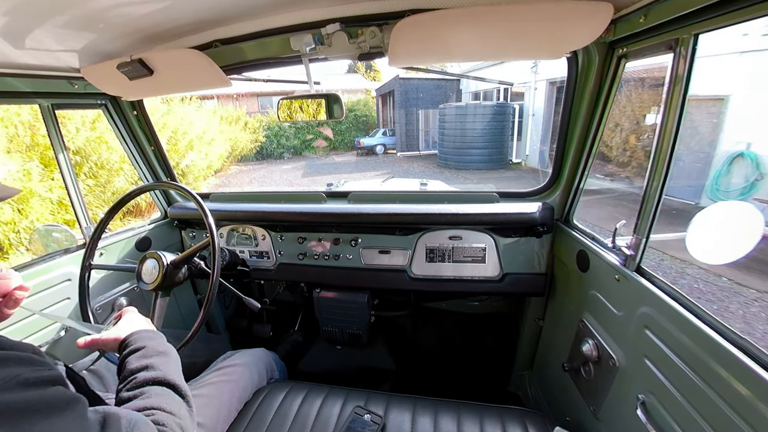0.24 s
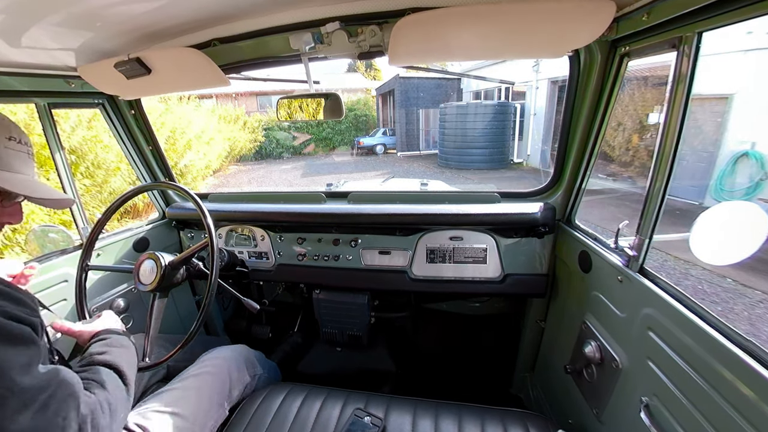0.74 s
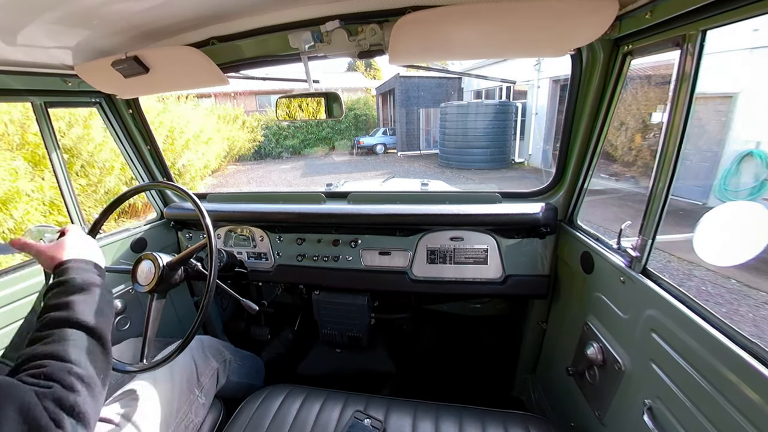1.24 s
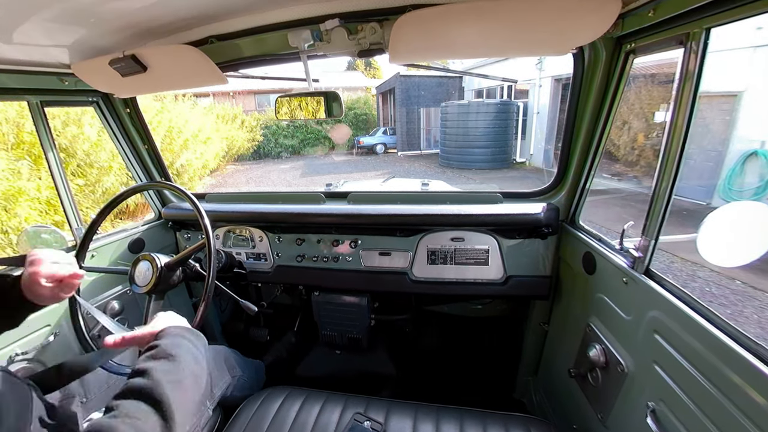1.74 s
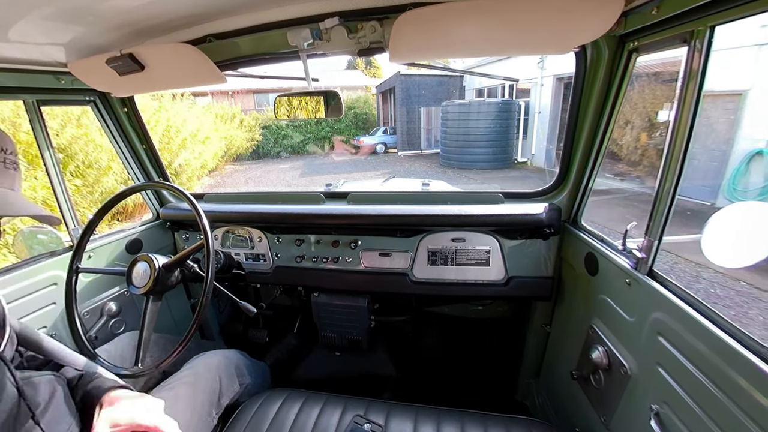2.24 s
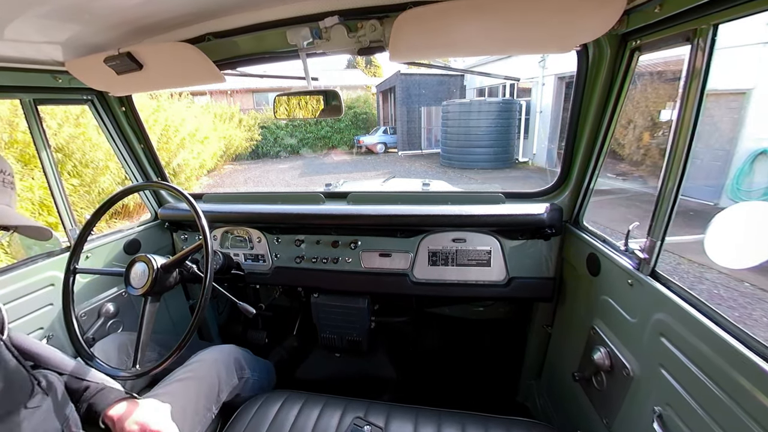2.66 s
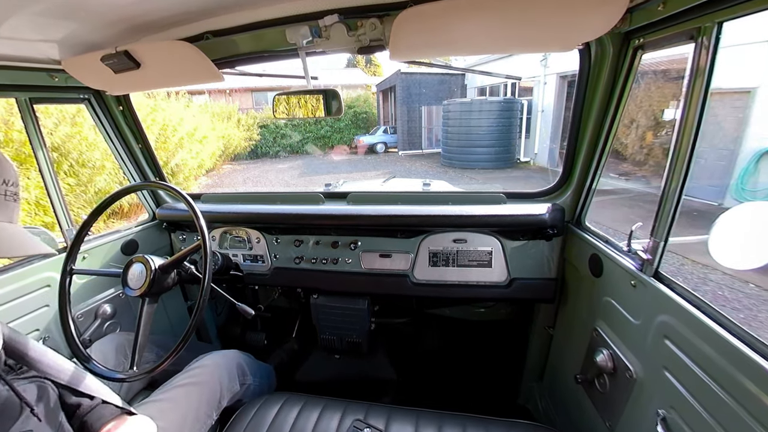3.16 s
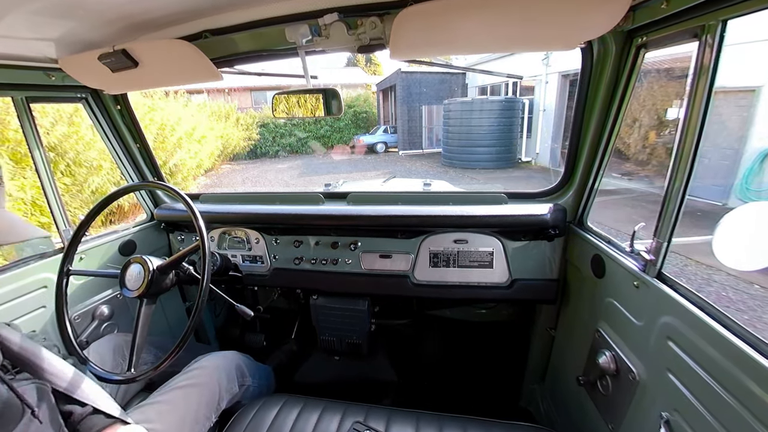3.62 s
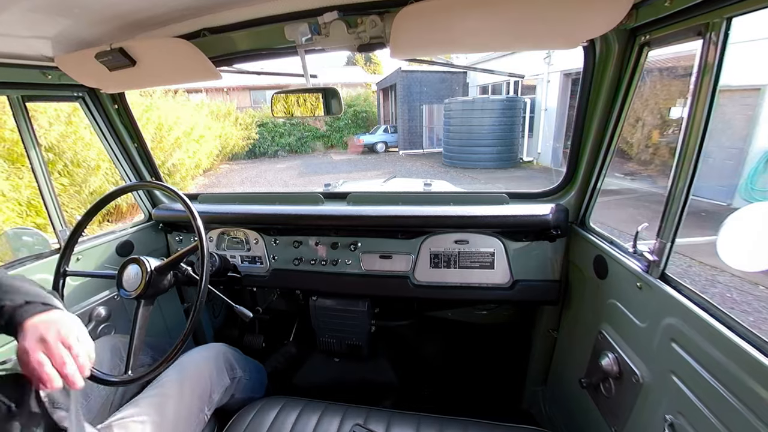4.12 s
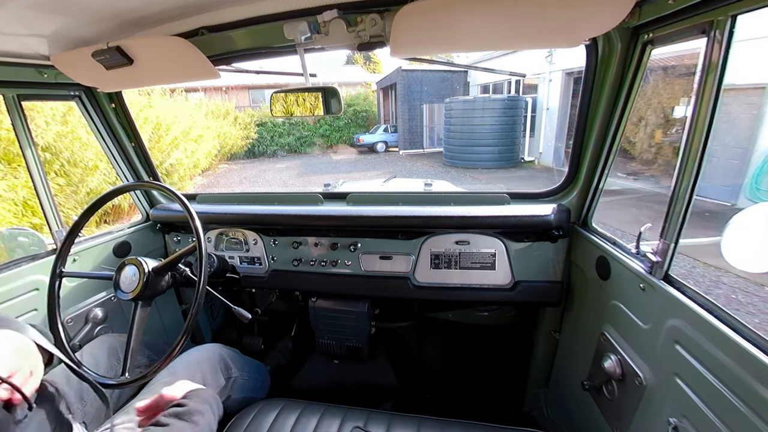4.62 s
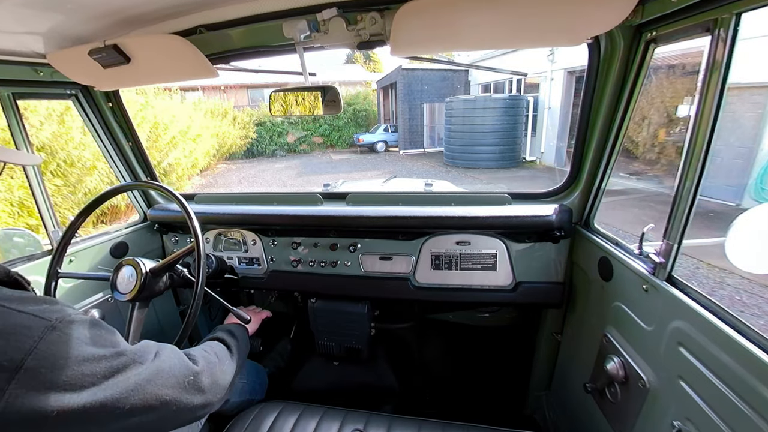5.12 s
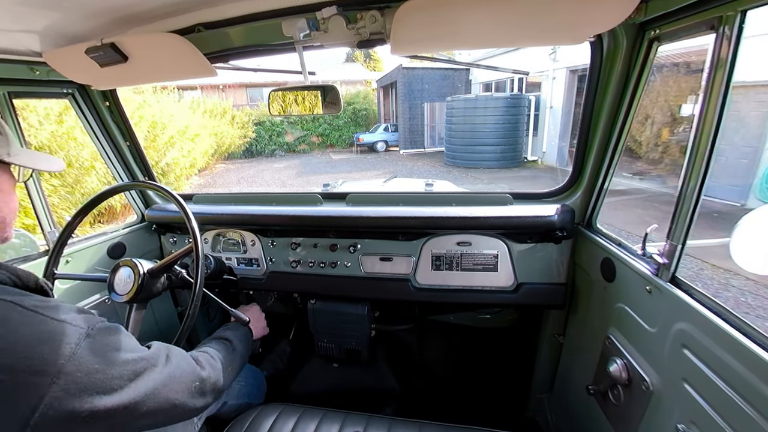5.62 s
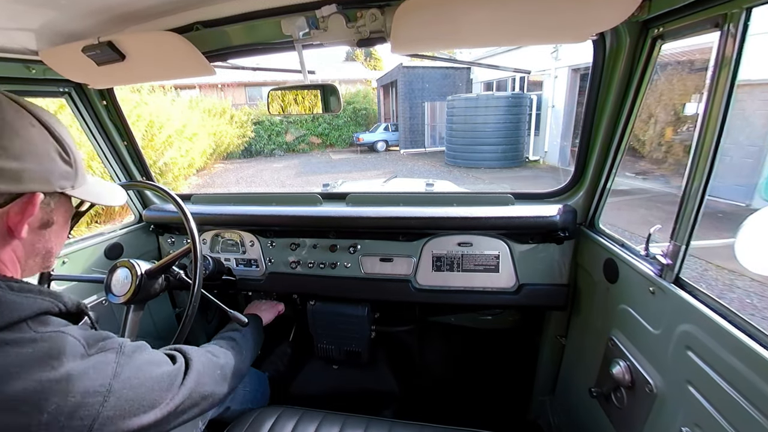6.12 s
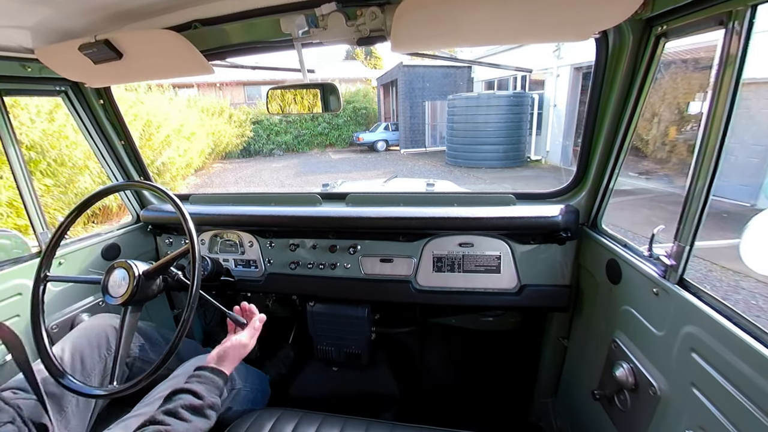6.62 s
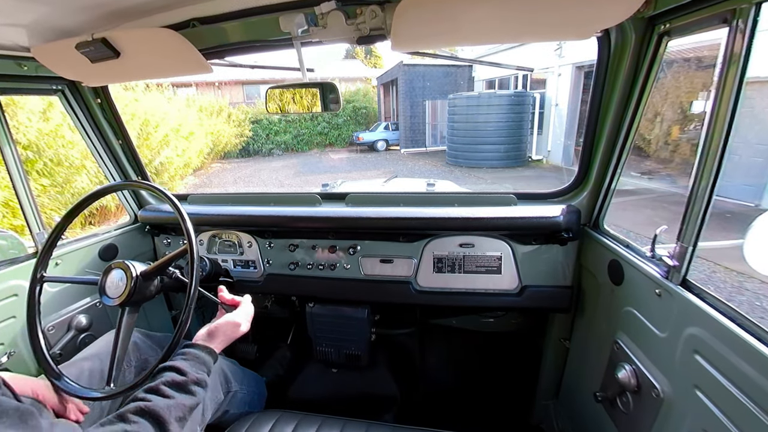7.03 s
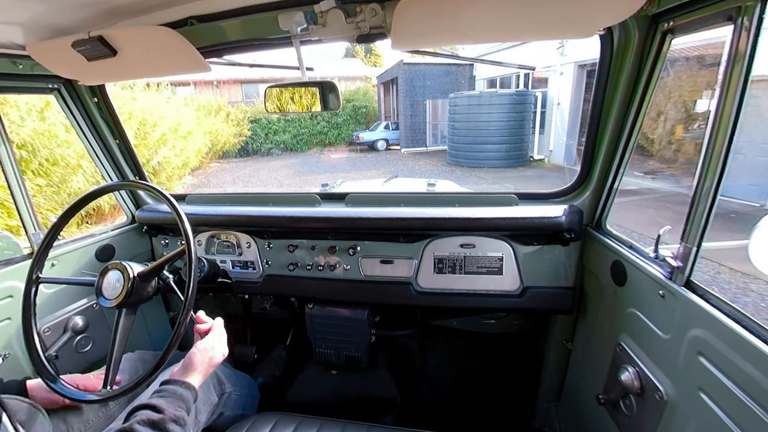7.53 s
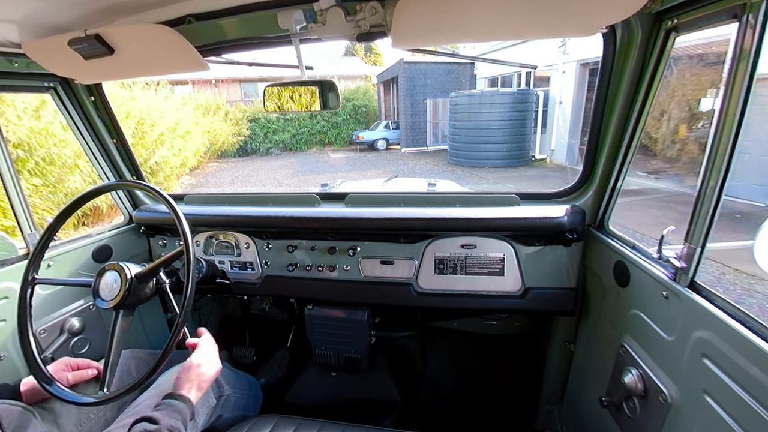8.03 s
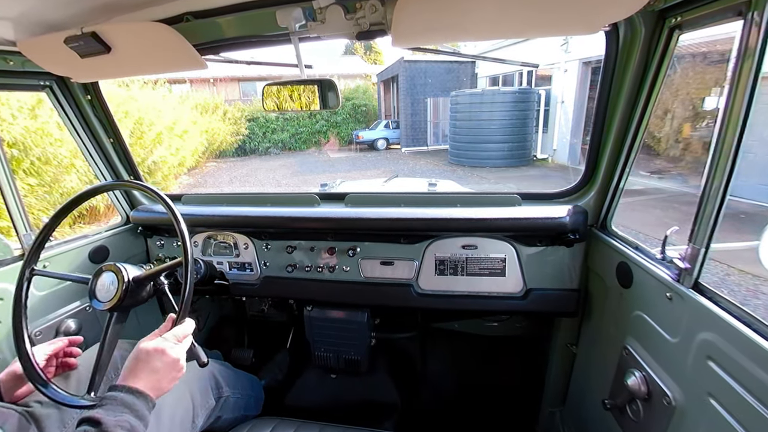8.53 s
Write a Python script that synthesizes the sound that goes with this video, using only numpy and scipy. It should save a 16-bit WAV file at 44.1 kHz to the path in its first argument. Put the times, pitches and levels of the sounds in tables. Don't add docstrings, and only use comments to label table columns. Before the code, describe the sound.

Inside a bare metal off-road vehicle cab, an old six-cylinder engine idles with a low, uneven boom and ticking valves. Seatbelt webbing rustles and metal tongue and buckle click sharply. The throttle is blipped once and revs sink back, a handle rattles, then a gear lever thuds with squeaky scraping linkage. Finally the engine swells deeper and louder. Fixed microphone in the cab, close to the driver.

```python
import sys
import numpy as np
from scipy import signal
from scipy.fft import rfft, irfft, next_fast_len
from scipy.io import wavfile
from scipy.ndimage import uniform_filter1d

SR = 44100
rng = np.random.default_rng(int(sys.argv[2]) if len(sys.argv) > 2 else 0)


def file_out(sig):
    cols = np.atleast_2d(sig).T
    lim = np.clip(cols, -1, 1)
    pcm = np.round(lim * 32767).astype(np.int16)
    wavfile.write(sys.argv[1], SR, pcm)


def rack_gain(trim_db):
    fader = np.asarray(trim_db, float)
    return 10 ** (fader / 20)


N = 386757

# (frequency [Hz], level [dB per Hz])
CAB_AIR = [(12, -25), (20, -22), (28, -1.5), (34, -7.5), (43, 2), (51, -13), (62, -21.5), (76, -18.5),
           (102, -9.5), (125, -13), (147, -13.5), (205, -10), (230, -14), (246, -22), (262, -19.5),
           (290, -29.5), (330, -37)]
# (time [s], peak level [dB], body below [dB], sparkle below [dB], t60 [s])
BELT = [(0.2345, -42, -11, -13, 0.27), (0.9718, -41.5, -16, -29, 0.27), (0.997, -37, -19, -18, 0.17),
        (1.1343, -45, -7, -20, 0.11), (1.5045, -64, -3, -26, 0.11), (1.6026, -37.5, -8, -16, 0.27),
        (1.7324, -57, 10, -16, 0.1), (1.838, -52, 6, -18, 0.11), (1.991, -34, -21, -11.5, 0.18),
        (2.219, -27.5, -30, -11.5, 0.19), (3.046, -37, 1.5, -28, 0.055), (3.145, -33, -19, -13, 0.19),
        (3.3214, -44, -25, -18, 0.078), (3.33, -26.5, -21, -23, 0.11), (3.4141, -44.5, -15, -16, 0.056),
        (3.524, -41, -11, -32, 0.11), (3.741, -46, -13, -18, 0.1), (3.7495, -24, -20, -11, 0.145),
        (3.9389, -46, -4, -22, 0.072), (4.035, -39.5, -14, -15, 0.074), (4.128, -30.5, -9, -32, 0.06)]


def rms_one(x):
    return x / np.sqrt(np.mean(x ** 2) + 1e-20)


def in_time(rows):
    s, *columns = np.transpose(rows)
    return [np.interp(np.arange(N) / SR, s, c) for c in columns]


def at_hz(points, hz):
    points = np.array(points)
    return np.interp(np.log(hz), np.log(points[:, 0]), points[:, 1], left=-90, right=-90)


def drift(rate, step=1):
    r = np.exp(-80 * np.pi * rate / SR)
    white = rng.standard_normal(N // 40 + 2002)
    slow = signal.lfilter([1], [1, -2 * r, r * r], white)[2000:]
    return np.interp(np.arange(0, N, step) / 40, np.arange(len(slow)), rms_one(slow - slow.mean()))


def swells(rows, height=lambda v: v):
    t = np.arange(0, N, 64) / SR
    bells = sum(height(v) * np.exp(-((t - s) / half_s) ** 2) for s, v, half_s in rows)
    return np.interp(np.arange(N) / SR, t, bells)


def coloured(x, spectrum):
    size = next_fast_len(len(x))
    hz = np.maximum(np.fft.rfftfreq(size, 1 / SR), 1)
    return irfft(rfft(x, size) * rack_gain(at_hz(spectrum, hz)), size)[:len(x)]


def band(x, low_hz, high_hz):
    return signal.sosfilt(signal.butter(2, [low_hz, high_hz], "band", fs=SR, output="sos"), x)


def ring(strikes, hz, t60_s):
    r, w = rack_gain(-60 / (t60_s * SR)), 2 * np.pi * hz / SR
    return signal.lfilter([0, np.sin(w)], [1, -2 * r * np.cos(w), r * r], strikes + 1e-18)


def bursts(rows, spectrum, grain_db):
    envelopes, t = np.zeros((3, N + SR)), np.arange(SR // 2) / SR
    for s, peak_db, body_db, sparkle_db, t60_s, rise_s in rows:
        for k, (rel_db, lasts) in enumerate(((body_db, .8), (0, 1), (sparkle_db, .75))):
            decay = rack_gain(-60 * t / (t60_s * lasts)) + 0.22 * rack_gain(-60 * t / 0.15)
            shape = (1 - np.exp(-t / rise_s)) * decay
            if rise_s < .005:
                shape *= 1 + .25 * np.exp(-t / .004)
            envelopes[k, round(s * SR):][:len(t)] += rack_gain(peak_db + rel_db) * shape / shape.max()
    modes = rng.standard_normal(SR // 8) * rack_gain(-60 * t[:SR // 8] / 0.082)
    modes[0] = 25
    rattle = signal.oaconvolve(rng.standard_normal(N), modes)[:N]
    crackle = coloured(rattle * rack_gain(grain_db * drift(450)), spectrum)
    edges_hz = ((500, 3100), (2700, 8800), (8200, 17000))
    return sum(e[:N] * rms_one(band(band(crackle, *edge), *edge)) for e, edge in zip(envelopes, edges_hz))


def engine_lines(firing_hz, load_db, bark_db):
    # (multiple of the engine cycle [1], level at idle [dB])
    orders = [(2, -15), (3, -17), (4, -12), (5, 0), (6, -1), (7, -5), (8, -15), (10, -17), (12, -9),
              (14, -15), (16, -17), (18, -14), (20, -20), (24, -12), (26, -11), (28, -12), (29, -13),
              (30, -15), (32, -14), (36, -25)]
    step = 16
    cycle, out = np.cumsum(firing_hz) / 6 / SR, 0
    drives_db = {6: load_db, 12: bark_db, 18: bark_db, 30: -.2 * load_db, 36: .5 * load_db}
    for multiple, level_db in orders:
        air_db = at_hz(CAB_AIR, np.clip(firing_hz[::step] * multiple / 6, 13, 315))
        slide_db = (.55 if multiple < 20 else 1.2) * (air_db - air_db[0])
        drive_db = drives_db.get(multiple, -.8 * load_db)[::step]
        gain = rack_gain(level_db + slide_db + drive_db + 2.5 * drift(1.3, step=step))
        out = out + gain * np.sin(2 * np.pi * (multiple * cycle[::step] + rng.random()))
    return signal.resample_poly(out, step, 1)[:N], cycle


def split_level(x, boom_db, drone_db):
    out = 0
    for kind, level_db in (("low", boom_db), ("high", drone_db)):
        part = signal.sosfiltfilt(signal.butter(4, 78, kind, fs=SR, output="sos"), x)
        out = out + rack_gain(level_db) * part / np.sqrt(uniform_filter1d(part ** 2, size=3600) + 0.0077)
    return out


def engine_bass(lines, load_db, opening_db, shift_db):
    # (time [s], level [dB], half length [s])
    lurches = [(0.04, -14, 0.023), (0.18, -22.5, 0.045), (0.35, -13.5, 0.032), (0.78, -18.5, 0.11),
               (0.91, -20, 0.022), (1.02, -19.5, 0.025), (1.24, -27.0, 0.048), (1.45, -18, 0.023),
               (1.58, -16.5, 0.035), (1.76, -19, 0.086), (2.21, -24, 0.2), (2.48, -21, 0.046),
               (2.6, -20, 0.037), (2.79, -24, 0.047), (3.2, -21, 0.21), (3.66, -19.5, 0.097),
               (3.99, -22, 0.057), (4.24, -16.5, 0.081), (4.51, -24, 0.086), (5.05, -12.5, 0.14),
               (5.92, -27, 0.06), (6.11, -15.5, 0.033), (6.23, -28.5, 0.37), (6.7, -22.5, 0.091),
               (6.87, -18, 0.067), (7.43, -23.0, 0.083), (7.7, -9, 0.047), (8.07, -27, 0.03),
               (8.4, -11, 0.11), (8.64, -19, 0.083)]
    # (time [s], lift [dB], half length [s])
    hushes = [
        (7.62, -2, .1),
        (8.42, -3, .14),
        (5.42, 2, .16),
        (5.0, 1, .08),
    ]
    shake = rms_one(coloured(rng.standard_normal(N), CAB_AIR)) * rack_gain(-3.2 - .5 * load_db)
    boom_db = 20 * np.log10(rack_gain(-22.5 + 0.18 * load_db) + rack_gain(1) * swells(lurches, rack_gain))
    drone_db = -24 + swells(hushes) + 0.38 * opening_db + 0.35 * shift_db + .15 * (boom_db + 19.0)
    return split_level(rms_one(lines) + shake, boom_db, drone_db)


def beat(cycle, times, sharp):
    return np.exp(-sharp * (cycle * times % 1))


def roar(white, cycle):
    # (frequency [Hz], level [dB per Hz])
    roar_spectrum = [(160, -31.5), (280, -8), (427, -0.5), (516, -3.5), (549, 0), (650, -4), (832, -4),
                     (1500, -32.5), (1950, -26.5), (3300, -120)]
    puffs = 1 + .3 * beat(cycle, 6, 4)
    return rms_one(coloured(white * puffs * rack_gain(0.9 * drift(11)), roar_spectrum))


def valve_gear(cycle, opening_db):
    ticks = 1 + .9 * beat(cycle + .27, 1, 7) + .5 * beat(cycle + .27, 2, 2.5)
    ticks += .5 * (1 + np.cos(6 * np.pi * (cycle + .05)))
    return 1.4 + (ticks - 1.4) * rack_gain(-1.5 * opening_db)


def whine(white, cycle, load_db):
    slip = .8 * rms_one(band(white, 10, 36))
    return rack_gain(-55 + .95 * load_db + 3.5 * drift(12)) * np.sin(2 * np.pi * 54.2 * cycle + slip)


def panel_hum(white):
    # (frequency [Hz], rms level [dB], t60 [s])
    panel_modes = [(261, -47, .25), (351.8, -49.5, 0.16), (425.2, -48, 0.3), (592.3, -51.5, 0.2),
                   (702, -61.5, 0.052), (850, -56, 0.26), (1168, -60, 0.05)]
    return sum(rack_gain(level_db) * rms_one(ring(white, hz, t60_s)) for hz, level_db, t60_s in panel_modes)


def intake(white, opening_db, flutter):
    suck = rms_one(band(band(white, 6400, 11000), 5000, 12000))
    return rack_gain(-71) * opening_db ** .4 * flutter ** 2 * suck


def engine():
    # (time [s], firing rate [Hz], evenness of firings [dB], throttle bark [dB])
    throttle = [(0, 42.8, 0, 0), (4.6, 42.85, 0, 0), (4.87, 44, 2, -3), (5.03, 51.5, 12, 1),
                (5.15, 64, 8, 11), (5.25, 68.5, 7, -2), (5.37, 67.5, 7, -8), (5.65, 58, 11, -6),
                (5.9, 52.5, 9, 3), (6.2, 47.7, 9, -6), (6.5, 45.5, 4, -4), (6.85, 44, 5, -1),
                (7.2, 43.3, 1, 0), (8.12, 43.3, 1, 0), (8.22, 44.8, 7, -2), (8.36, 52, 13, -3),
                (8.63, 60.3, 12, 0), (8.77, 63.2, 12, 6)]
    # (time [s], lift [dB], half length [s])
    openings = [
        (5.08, 9, 0.145),
        (8.38, 3, .12),
        (8.62, 1, .2),
    ]
    # (time [s], lift [dB], half length [s])
    shifts = [(0, -1.5, 0.11), (.75, 2, 0.18), (1.15, 2, 0.088), (1.7, 2, 0.27), (2.26, 3.5, .1),
              (2.8, -0.5, 0.17), (4.2, 3, 0.2), (5.76, 3, .15), (6.18, 0.5, 0.076), (7.08, 4.5, 0.045),
              (7.2, 5, 0.064), (7.66, 12.5, 0.085), (8.0, -2, 0.11)]
    # (time [s], lift [dB], half length [s])
    rustles = [
        (1.12, 3.5, 0.26),
        (2.12, 6.5, 0.34),
        (4.12, 6, 0.12),
        (4.64, 5.5, 0.13),
        (5.44, -2.5, 0.13),
        (5.7, 5, 0.14),
        (6.3, 2.5, 0.22),
        (6.8, 3.5, 0.28),
        (7.21, -5, 0.13),
        (7.95, -6, 0.26),
    ]
    # (frequency [Hz], level [dB per Hz])
    hiss_spectrum = [(2200, -12.5), (3600, -7), (4300, -11), (5240, -0.5), (6500, -4), (7800, -6),
                     (8500, -18), (10500, -22), (12000, -32), (15500, -43)]
    dull_spectrum = [(590, -40.5), (1000, 7.5), (1080, -2), (1260, -1), (1430, -4), (4200, -16),
                     (5460, -31), (9240, -120)]

    firing_hz, load_db, bark_db = in_time(throttle)
    opening_db, shift_db, rustle_db = swells(openings), swells(shifts), swells(rustles)
    lines, cycle = engine_lines(firing_hz, load_db, bark_db)
    white = rng.standard_normal((3, N))
    flutter = rack_gain(0.78 * drift(8.9))
    ticking = valve_gear(cycle, opening_db) * flutter

    roar_db = -40.5 + opening_db + shift_db
    hiss_db = -52.5 + 1.08 * opening_db + rustle_db
    dull_db = -48.5 + 0.99 * opening_db + .55 * shift_db + .3 * rustle_db
    out = engine_bass(lines, load_db, opening_db, shift_db)
    out = out + rack_gain(roar_db) * roar(white[0], cycle)
    out += rack_gain(hiss_db) * rms_one(coloured(white[1] * ticking, hiss_spectrum))
    out += rack_gain(dull_db) * rms_one(coloured(white[2] * ticking, dull_spectrum))
    out += whine(white[2], cycle, load_db) + panel_hum(white[1])
    return out + intake(white[0], opening_db, flutter)


def thumps():
    # (time [s], peak level [dB], pitch [Hz], t60 [s], rise [s])
    blows = [
        (.44, -23, 269, 0.17, 0.013),
        (2.239, -33, 298, 0.12, 0.013),
        (5.36, -22.5, 138.3, 0.29, 0.02),
        (6.62, -13.5, 116.6, 0.1, 0.031),
        (6.631, -27.5, 275, 0.22, .015),
        (7.356, -9.5, 118.5, 0.14, 0.0021),
        (7.361, -21, 356, 0.3, 0.0026),
        (7.361, -23.5, 484, 0.064, 0.0048),
        (7.579, -28, 349, 0.49, 0.037),
        (7.622, -28, 133, 0.41, .03),
    ]
    # (time [s], peak level [dB], pitch [Hz], t60 [s], rise [s])
    shudders = [
        (5.0, -20, 103, 1.1, .04),
        (5.2, -16.5, 205, .75, .07),
        (4.97, -17, 50, .8, .05),
        (7.98, -27, 200, 1.2, .08),
        (5.3, -32.5, 605, .4, .02),
        (8.26, -24.5, 103, 2.2, .09),
    ]
    out, t = np.zeros(N + SR), np.arange(SR // 2) / SR
    for k, (s, peak_db, hz, t60_s, rise_s) in enumerate(blows + shudders):
        bright = rack_gain(-8 + 9.5 * np.log2(hz / 300)) * (k < len(blows))
        puff = rms_one(band(rng.standard_normal(len(t)), 250, 800)) * bright
        shape = (1 - np.exp(-t / rise_s)) * rack_gain(-60 * t / t60_s) * (1 - (t / t[-1]) ** 4)
        tone = np.sin(2 * np.pi * hz * t)
        out[round(s * SR):][:len(t)] += rack_gain(peak_db) * shape / shape.max() * (tone + puff)
    return out[:N]


def rubs():
    # (time [s], peak level [dB], body below [dB], sparkle below [dB], t60 [s])
    slides = [(.41, -39, -5, -21, 0.19), (0.434, -27, -11, -9, 0.17), (2.19, -43.5, 1, -8, 0.21),
              (2.225, -35, -8, -17, 0.18), (4.62, -50, -9, -21, 0.76), (5.382, -39, -2.5, -24, 0.13),
              (6.72, -45, -18, -20, 0.17), (7.02, -38.5, -2, -20, 0.34), (7.065, -42.5, -1, -11, 0.19),
              (7.15, -45.5, 6, -24, 0.45), (7.215, -51, 0, -24, 0.099), (7.265, -55, -5, -12, 0.066),
              (7.47, -47.5, 2, -21, 0.35), (7.54, -44.5, -3, -28, 0.58), (7.685, -57, -1, -14, 0.068),
              (7.776, -43.5, 2, -23, 0.24), (7.9, -52.5, 0, -24, 0.14), (7.97, -54, -2, -22, .15),
              (8.04, -48.5, 1, -26, 0.44)]
    # (frequency [Hz], level [dB per Hz])
    rub_spectrum = [(400, -10), (900, 1), (1700, -2), (3000, -6), (4400, -9), (5300, -3), (7600, -6),
                    (8600, -15), (10500, -17), (11500, -24), (16000, -27)]
    rows = [(*row, np.clip(0.067 * row[4], .003, 0.031)) for row in slides]
    return bursts(rows, rub_spectrum, grain_db=1.5)


def scrapes():
    # (time [s], peak level [dB], half length [s], pitch [Hz])
    scrape_events = [(5.35, -41, .06, 640), (5.0, -46, .08, 1500), (8.68, -45, .08, 590),
                     (0.11, -52, .012, 3200), (.14, -53, .012, 2100), (.17, -51, .02, 3400),
                     (0.208, -46, .012, 3700), (0.243, -44, .01, 3600), (5.719, -42, 0.023, 1300),
                     (5.843, -43, .012, 1400), (6.13, -54, .006, 3000), (6.39, -52, .01, 3200),
                     (7.04, -43, .015, 1700), (7.085, -33, 0.023, 1600), (7.076, -46, .03, 7250),
                     (7.193, -35, 0.022, 1100), (7.19, -41, .03, 2300), (7.23, -45, .015, 2900),
                     (7.075, -43, .025, 2300), (6.852, -38, .008, 3300), (2.27, -38, .04, 310),
                     (8.5, -60, .12, 7500), (7.24, -42, .015, 1500), (7.376, -30, 0.015, 1150),
                     (7.364, -36, .012, 2400), (7.405, -41, 0.014, 700), (7.57, -50, .015, 2500),
                     (7.61, -42.5, .012, 2500), (7.66, -48, .02, 2600), (7.678, -40, .01, 1100),
                     (7.81, -43, .01, 2300), (8.03, -47, .03, 800), (7.384, -42, 0.022, 6230),
                     (5.385, -41, 0.017, 1400), (5.68, -50.5, .06, 2500), (6.159, -48, .015, 1400),
                     (8.097, -39, .015, 950), (2.28, -54, .015, 9600), (.46, -42, .015, 2700),
                     (3.754, -37, .008, 2500), (3.337, -38, .008, 3000)]
    out, t = np.zeros(N + SR), np.arange(SR // 2) / SR - .25
    noise = rng.standard_normal(N + SR)
    noise[:N] *= rack_gain(3.5 * drift(200))
    for s, peak_db, half_s, hz in scrape_events:
        i = round(s * SR)
        grain = rms_one(band(noise[i:][:len(t)], hz / 1.29, hz * 1.29))
        out[i:][:len(t)] += rack_gain(peak_db) * np.exp(-(t / half_s) ** 2) * grain
    return out[SR // 4:][:N]


def chafes():
    # (time [s], peak level [dB], half length [s])
    chafe_events = [(7.005, -44, .01), (7.035, -44, .02), (7.085, -39, 0.024), (7.186, -40, 0.018),
                    (7.228, -42, 0.017), (7.273, -39.5, 0.011), (7.3, -50, .01), (7.5, -49, .04),
                    (7.547, -37, .008), (7.57, -37, .009), (7.594, -38, 0.014), (7.625, -44, .015),
                    (7.694, -46, 0.015), (7.785, -42, 0.014), (7.815, -42, .02), (7.91, -52, 0.02),
                    (7.985, -45.5, 0.022)]
    # (frequency [Hz], level [dB], t60 [s])
    squeal_modes = [(5060, 0.5, .03), (5290, -1, .03), (5580, -3, .03), (5800, -11, .03)]
    slips = rng.standard_normal(N) * rack_gain(2.2 * drift(150))
    squeal = sum(rack_gain(level_db) * rms_one(ring(slips, hz, t60_s)) for hz, level_db, t60_s in squeal_modes)
    hoarse = rms_one(band(band(slips, 4900, 6250), 4700, 5700))
    return swells(chafe_events, rack_gain) * rms_one(squeal + 1.1 * hoarse)


def contact_cracks():
    # (time [s], peak level [dB], body below [dB], sparkle below [dB], t60 [s])
    levers = [(.1045, -49, -8, -20, .12), (.163, -53, -8, -20, .12), (.198, -52, -8, -22, .1),
              (6.14, -48, -15, -24, 0.35), (7.8025, -38.5, 2, -20, .1), (4.6653, -40.5, -4, -34, 0.11),
              (5.369, -37, -19, -19, 0.17), (5.73, -43, -2, -24, 0.17), (5.8052, -46, -14, -26, 0.2),
              (5.84, -54, -7, -24, 0.1), (6.2083, -44.5, -17, -22, 0.15), (6.845, -32, -4.5, -24, 0.11),
              (7.001, -40, -3, -14, 0.14), (7.354, -26.5, -3, -21, 0.16)]
    # (frequency [Hz], level [dB per Hz])
    snap_spectrum = [(500, -30), (900, -8), (1700, -2), (2800, -4), (4500, -7), (5300, -1), (6300, 0),
                     (7800, -4), (8600, -13), (10500, -15), (11500, -19), (16000, -21)]
    rows = [(*row, .0008 if row[4] < .17 else .004) for row in BELT + levers]
    return bursts(rows, snap_spectrum, grain_db=2.5)


def buckle_rings():
    # (frequency [Hz], level [dB], t60 [s])
    buckle_modes = [(4720, 2, 0.25), (4900, -13, 0.28), (4930, -14, 0.23), (4650, -11, 0.07),
                    (5700, 2, 0.082), (6099, -3, 0.19), (6170, -19, 0.096), (7030, -7, 0.28),
                    (7640, -25.5, 0.21), (7650, 4, 0.26)]
    belt, out = np.array(BELT), np.zeros(N)
    at = np.round(belt[:, 0] * SR).astype(int)
    for hz, level_db, t60_s in buckle_modes:
        strikes = np.zeros(N)
        strikes[at] = rack_gain(belt[:, 1] + 5 * rng.standard_normal(len(belt)))
        out += ring(strikes * rack_gain(level_db - 21), hz, t60_s * .35)
    return out


def part_rings():
    # (time [s], frequency [Hz], level [dB], t60 [s])
    steel_parts = [(.445, 1660, -21, .055), (.444, 3330, -28, .21), (.446, 3530, -33, .14),
                   (.443, 640, -24.5, .11), (.446, 4167, -36, .09), (.446, 6400, -28, .13),
                   (.446, 5286, -32, .12), (.446, 2132, -36, .13), (.446, 7176, -34, .12), (2.24, 3230, -42, .2),
                   (3.752, 1370, -25, .036), (3.752, 6130, -19.5, .06), (4.669, 1570, -37, .19),
                   (4.668, 1950, -41, .12), (5.731, 1270, -33, .06), (5.839, 1270, -33, .05),
                   (6.846, 2580, -36, .03), (6.846, 3370, -34, .04), (7.076, 1140, -40, .1),
                   (7.08, 1905, -38, .1), (7.365, 1001, -30, .12), (7.367, 1174, -32, .16), (7.36, 2256, -36, .1),
                   (7.36, 2681, -36, .1), (8.07, 1730, -43, .25),
                   (.999, 5060, -40, .086), (.999, 7400, -46, .087), (.999, 4170, -48, .12),
              (1.993, 6465, -38, .1), (1.993, 7305, -42, .2), (1.993, 5383, -43, .2),
              (1.993, 4090, -43, .09), (2.221, 6390, -32, .12), (2.236, 6460, -29, .1),
              (2.229, 4845, -34, .12), (2.244, 5200, -34, .15), (2.226, 3550, -39, .12),
              (2.228, 1500, -36, .05), (2.24, 1800, -37, .05), (3.147, 5530, -39, .12),
              (3.147, 7400, -38, .07), (3.147, 3456, -36, .03), (3.332, 5890, -34, .14),
              (3.332, 3500, -36, .13), (3.332, 7050, -37, .14), (3.332, 2654, -41, .14),
              (3.716, 5200, -41, .04), (3.753, 5895, -30, .09), (3.764, 7070, -33, .12),
              (3.77, 6255, -33, .12), (3.752, 7750, -31, .12), (3.756, 9300, -36, .1), (.45, 3900, -35, .2),
              (.488, 640, -33, .06)]
    # (time [s], peak level [dB], pitch [Hz])
    trim = [
        (0.285, -29, 678),
        (0.343, -29, 501),
        (0.599, -30, 503),
        (1.733, -29, 517),
        (1.839, -27, 608),
        (5.307, -28, 614),
        (8.708, -29, 571),
    ]
    knocks = [(s, hz * part, db + 1, .045) for s, db, hz in trim for part in (1, 1.6)]
    pings_hz = 5810 * np.exp(0.08 * rng.standard_normal(len(BELT)))
    pings = [(row[0], hz, row[1] - 4, .04) for row, hz in zip(BELT, pings_hz)]
    wander = 1.7 * drift(60)
    out = np.zeros(N)
    for s, hz, level_db, t60_s in steel_parts + knocks + pings:
        i = round(s * SR)
        t = np.arange(min(SR // 3, N - i)) / SR
        shape = (1 - np.exp(-t / .0012)) * rack_gain(level_db - 60 * t / t60_s)
        out[i:][:len(t)] += shape * np.sin(2 * np.pi * hz * t + wander[i:][:len(t)])
    return out


def scene():
    driver = thumps() + rubs() + scrapes() + chafes()
    clicks = contact_cracks() + buckle_rings() + part_rings()
    return (engine() + driver + clicks)[None]


def band_limit(x):
    return signal.sosfilt(signal.butter(12, 15770, fs=SR, output="sos"), x)


def record(dry):
    top = signal.cheby2(10, 60, 16100, fs=SR, output="sos")
    mix = signal.sosfilt(top, 0.85 * np.tanh(dry / 0.97))
    return band_limit(mix)


dry = scene()
out = record(dry)
file_out(out)
```